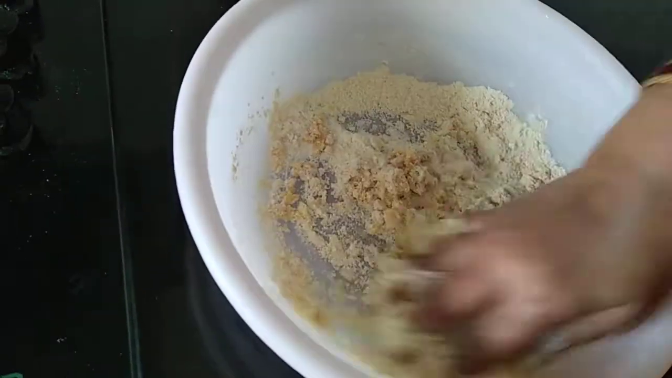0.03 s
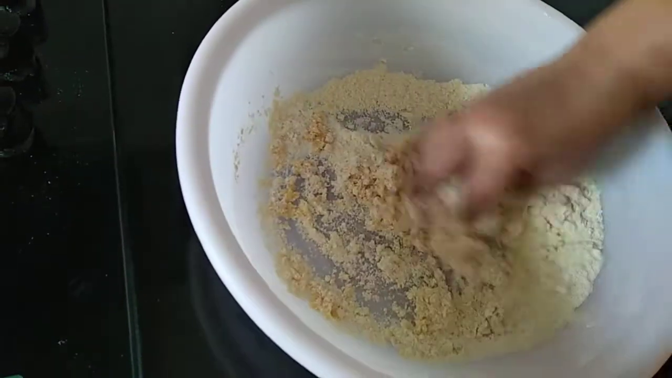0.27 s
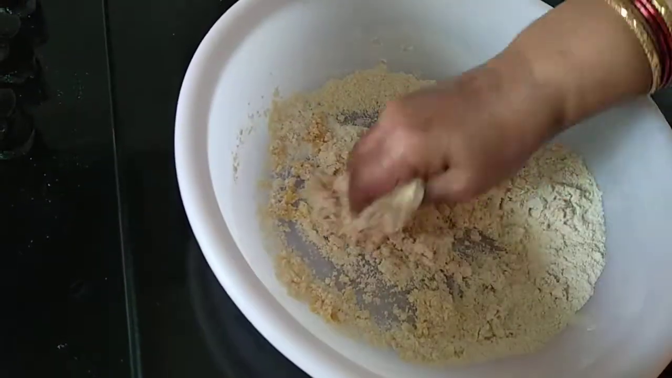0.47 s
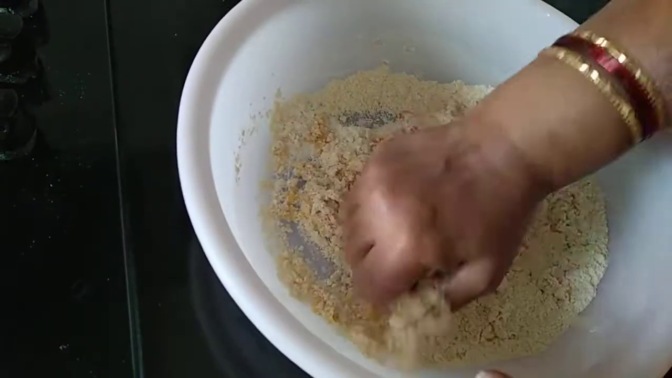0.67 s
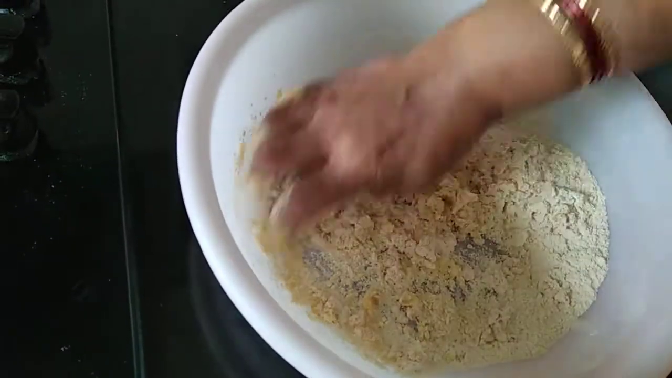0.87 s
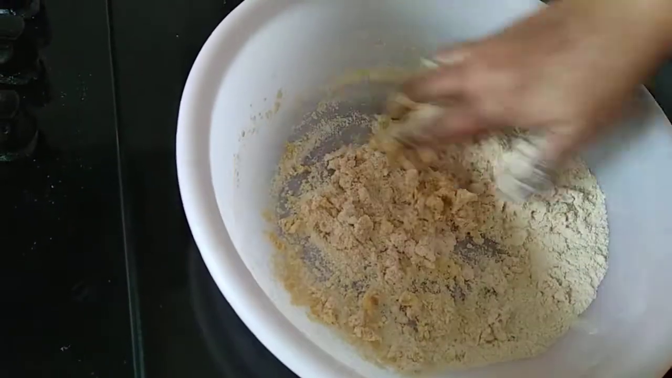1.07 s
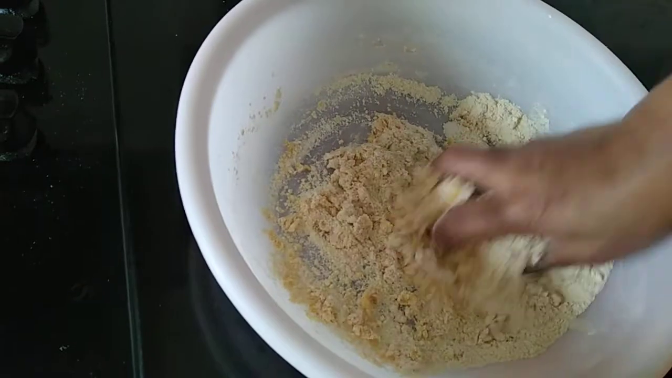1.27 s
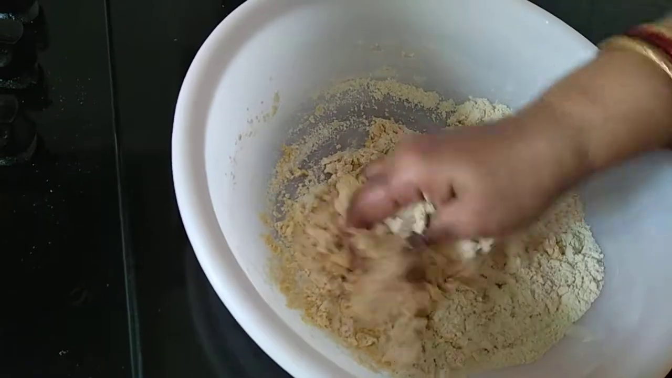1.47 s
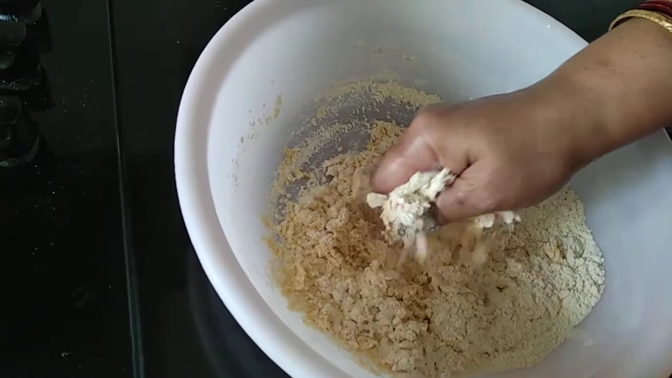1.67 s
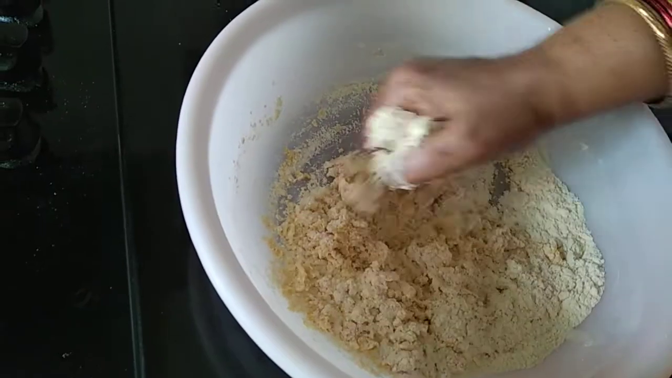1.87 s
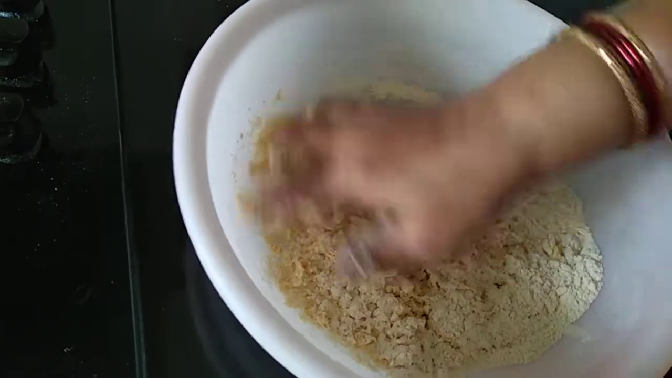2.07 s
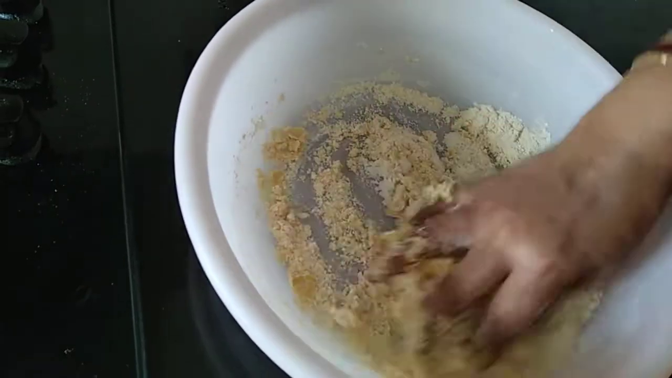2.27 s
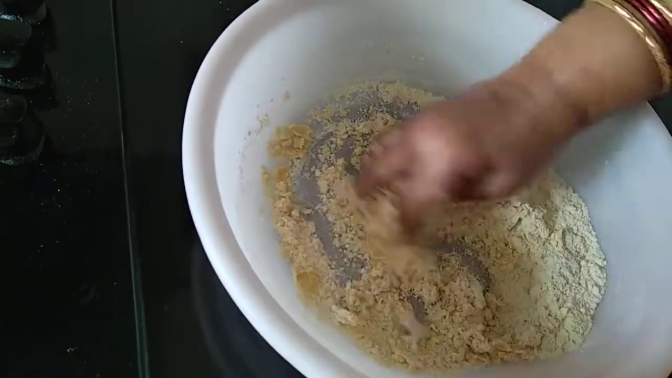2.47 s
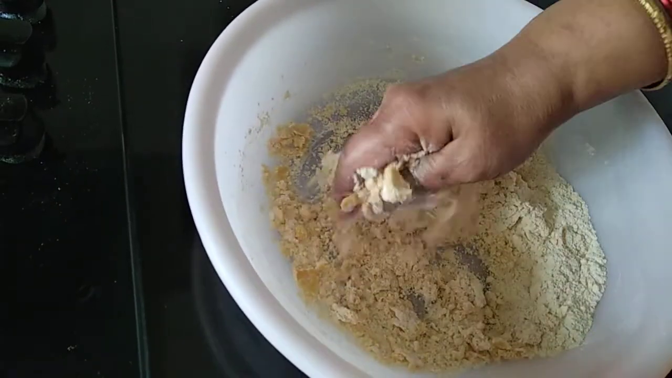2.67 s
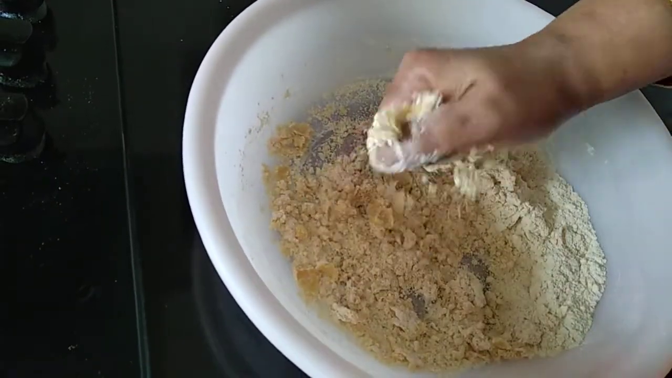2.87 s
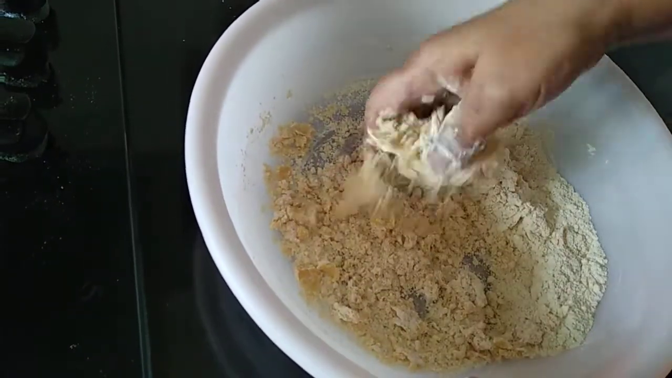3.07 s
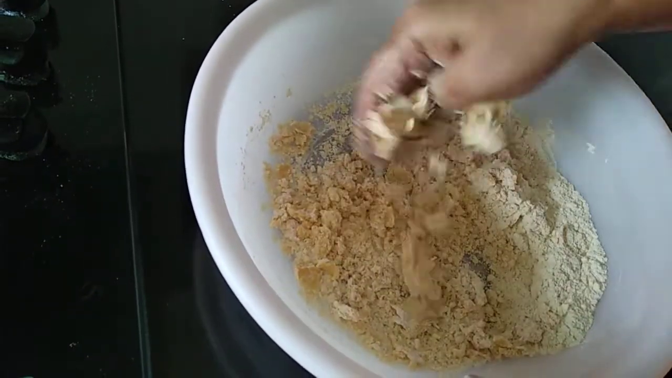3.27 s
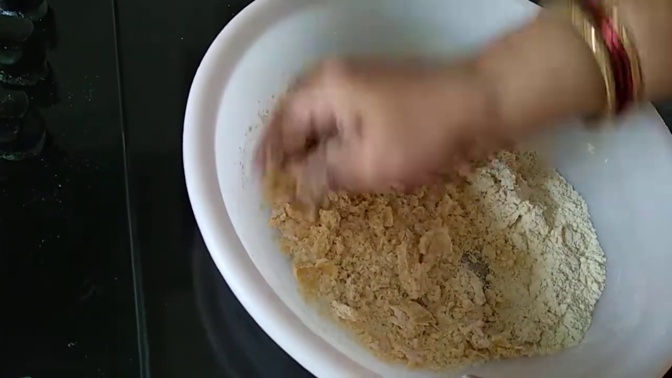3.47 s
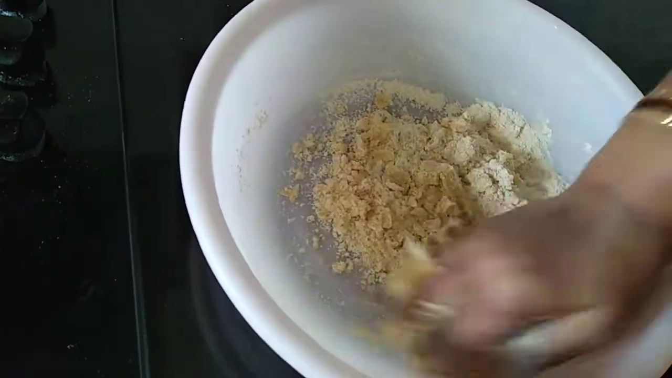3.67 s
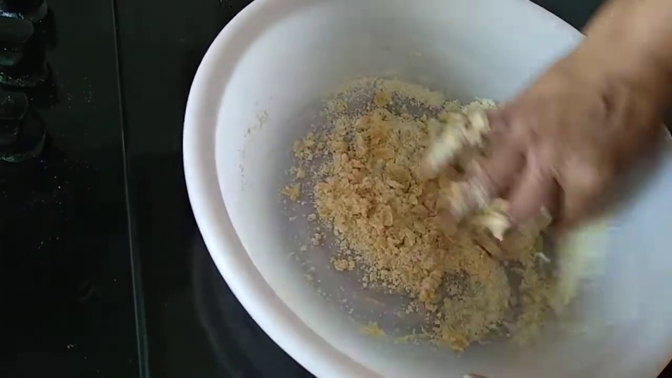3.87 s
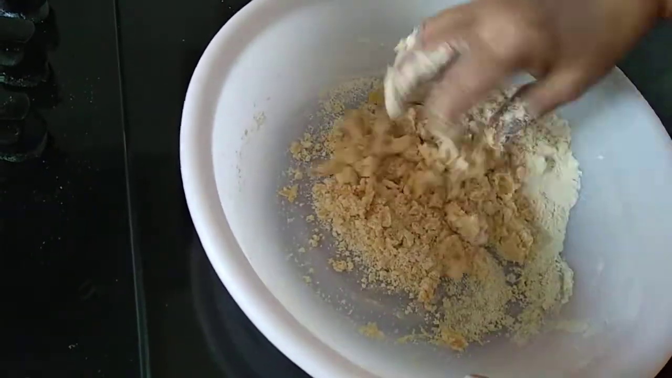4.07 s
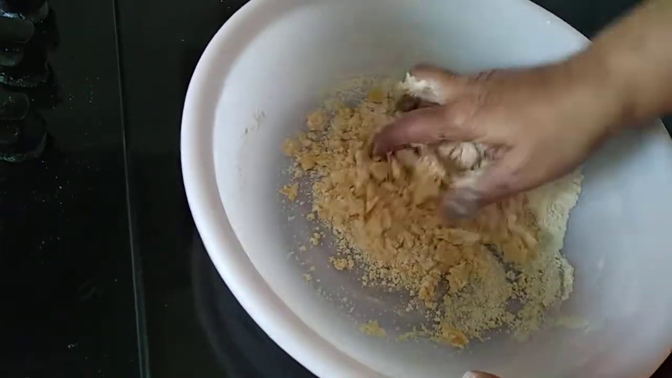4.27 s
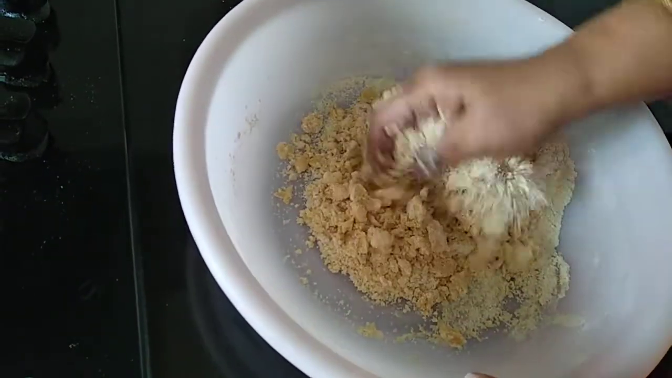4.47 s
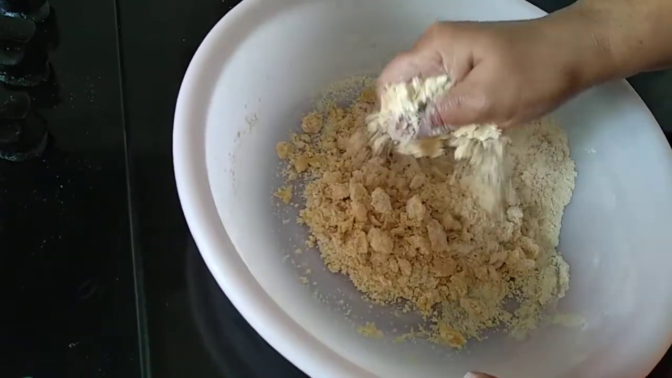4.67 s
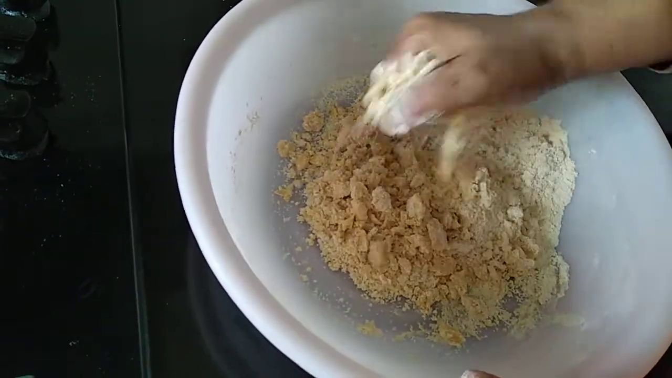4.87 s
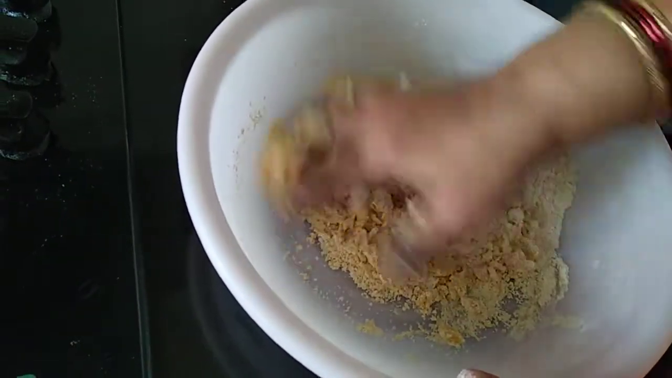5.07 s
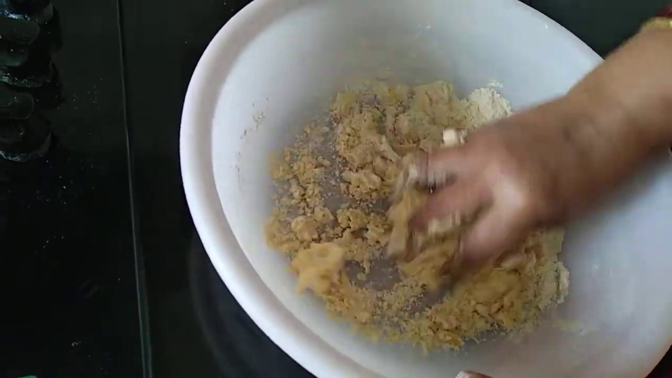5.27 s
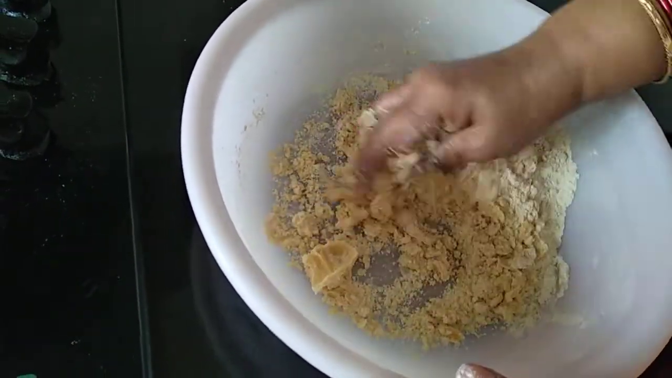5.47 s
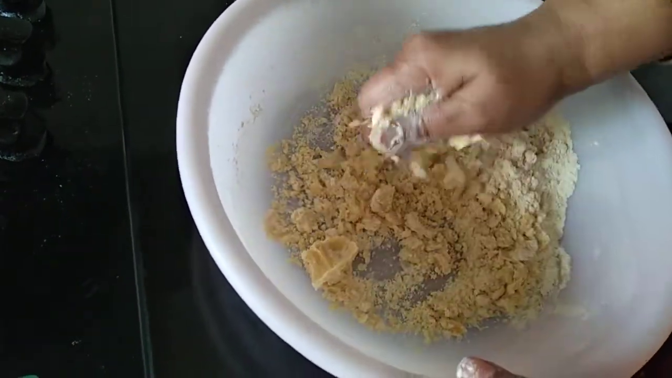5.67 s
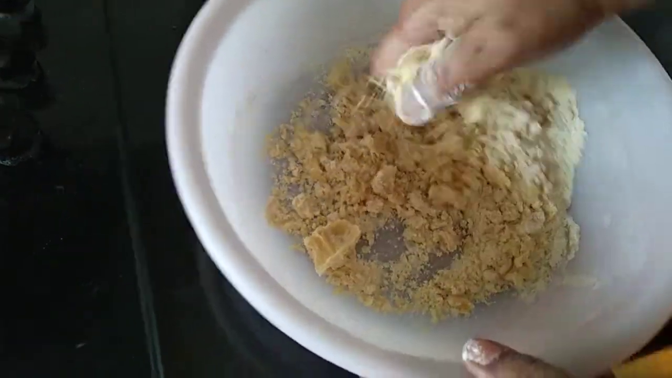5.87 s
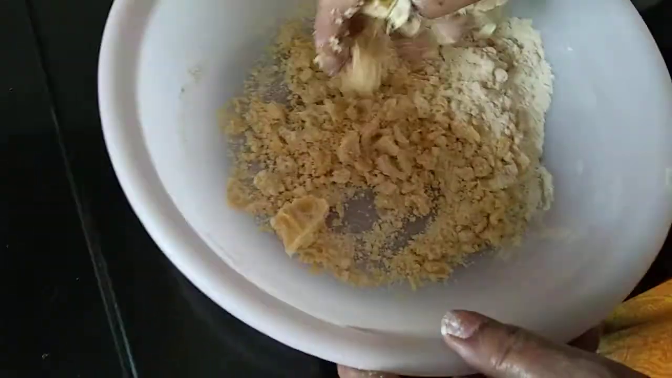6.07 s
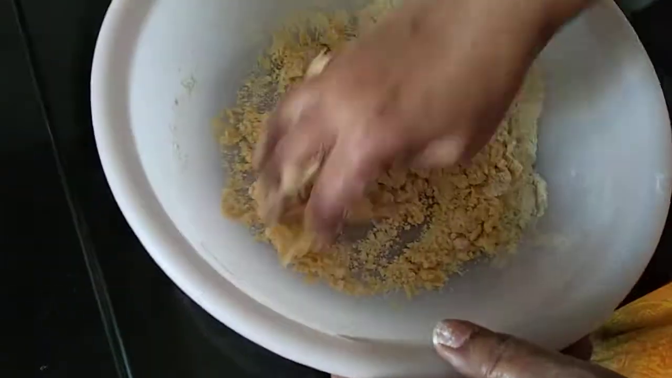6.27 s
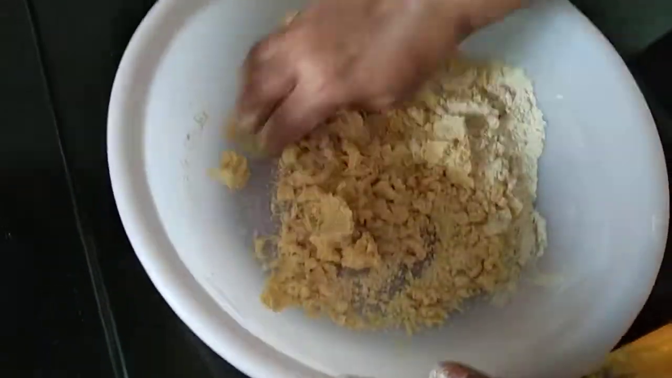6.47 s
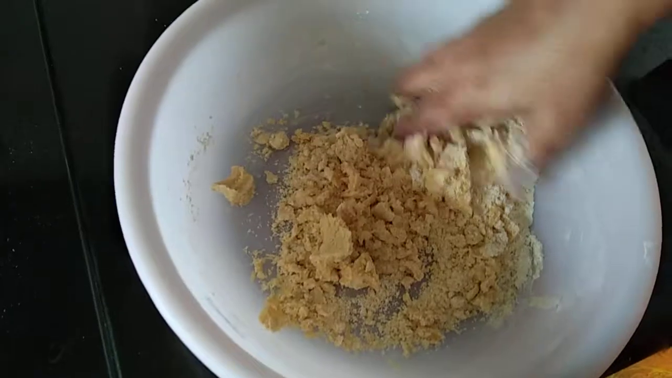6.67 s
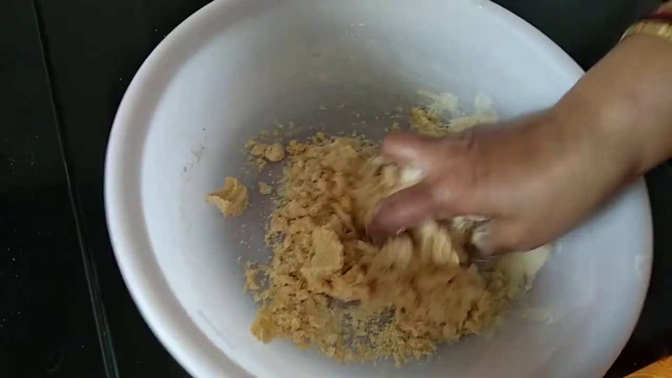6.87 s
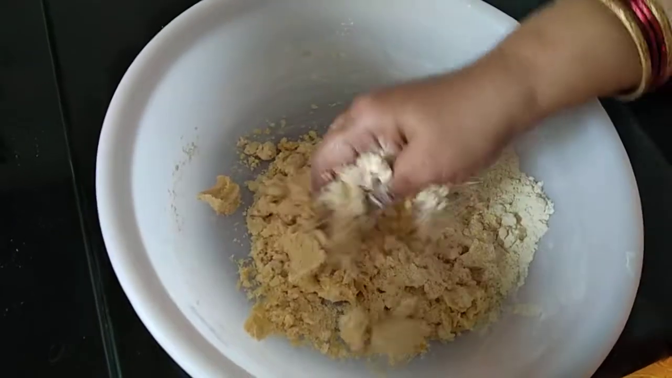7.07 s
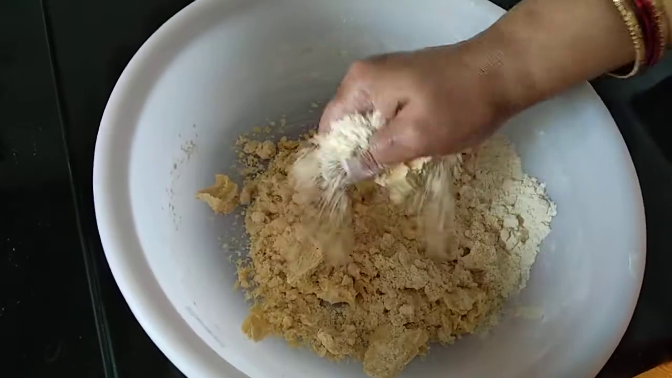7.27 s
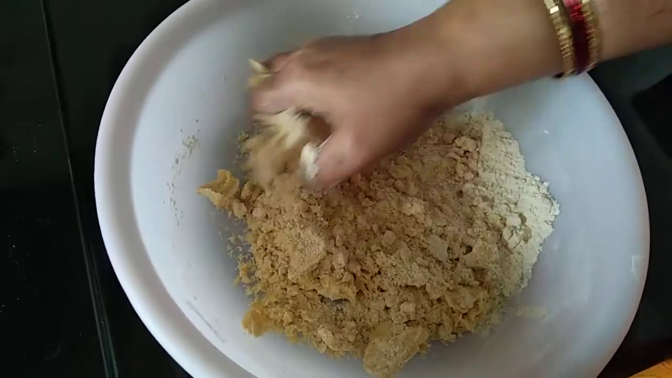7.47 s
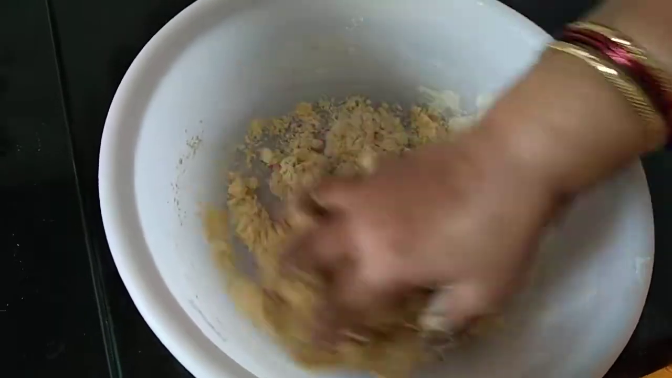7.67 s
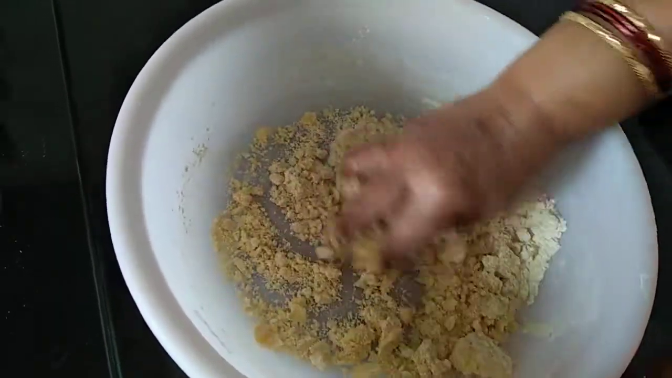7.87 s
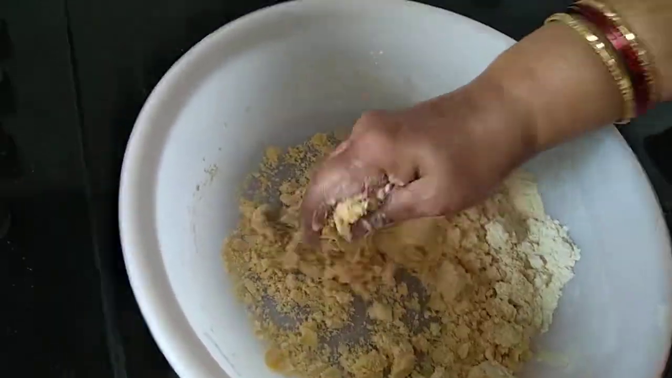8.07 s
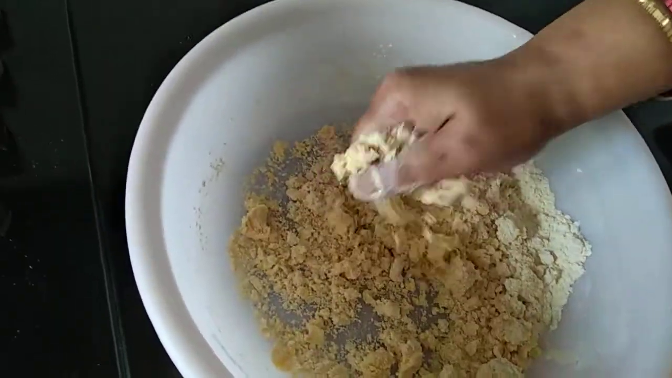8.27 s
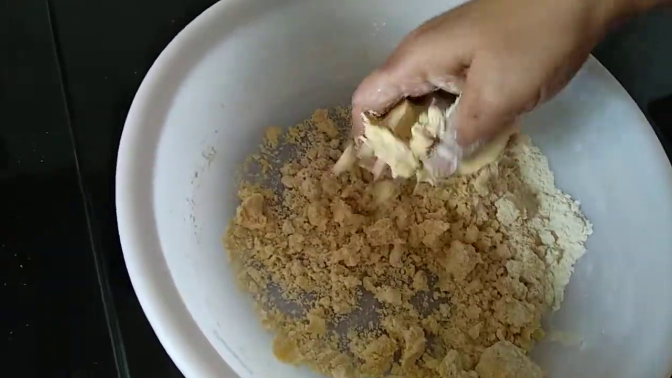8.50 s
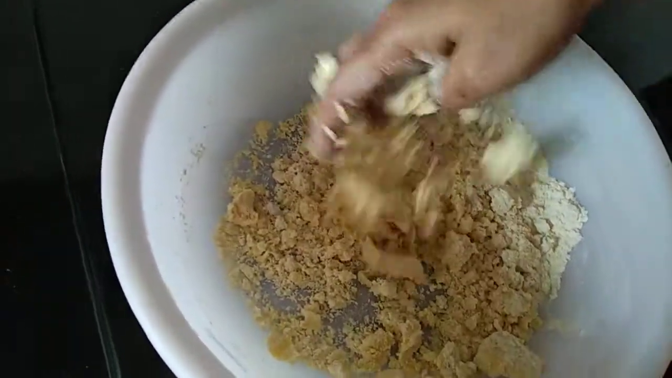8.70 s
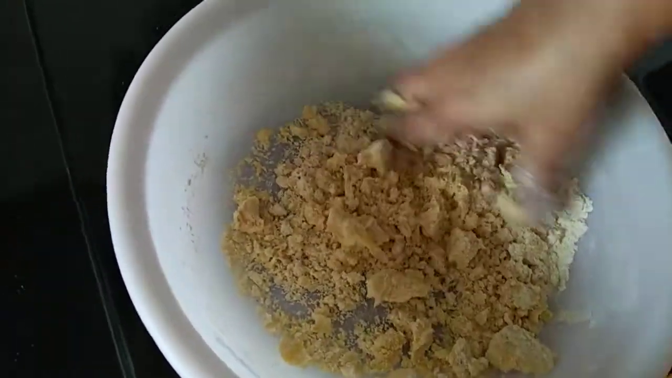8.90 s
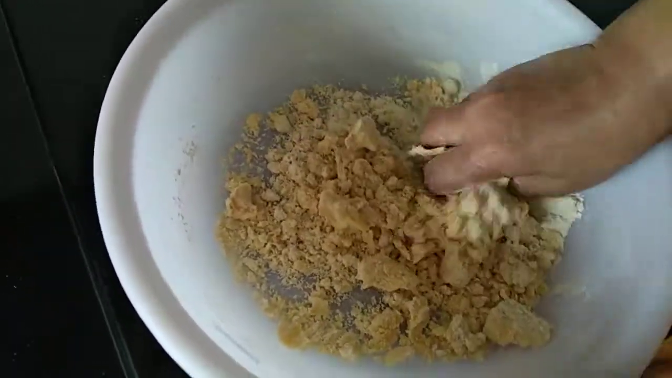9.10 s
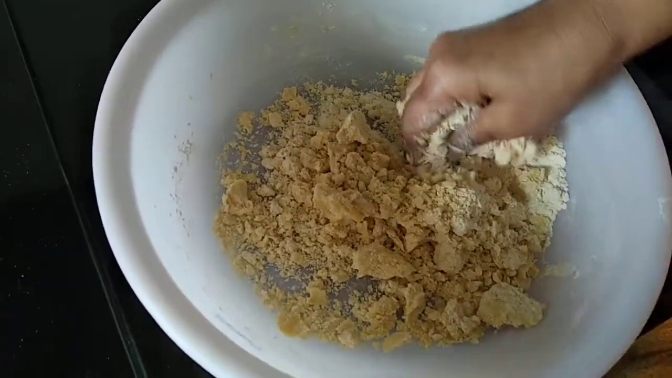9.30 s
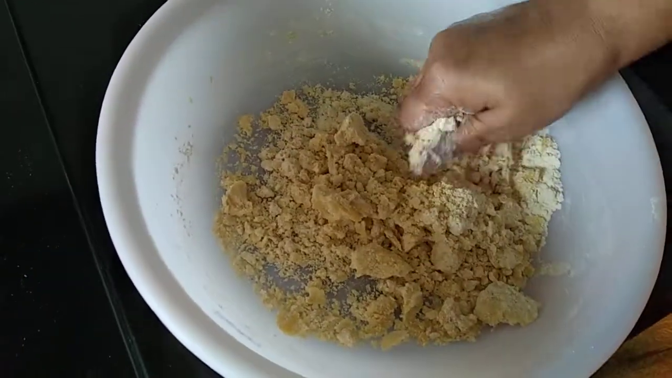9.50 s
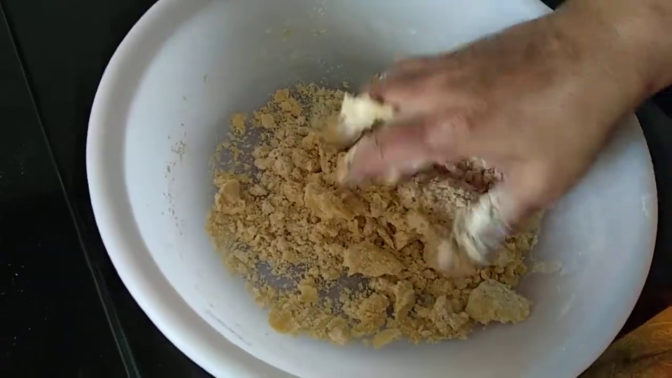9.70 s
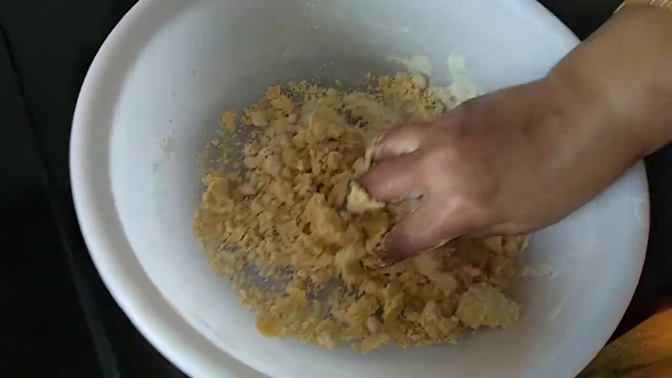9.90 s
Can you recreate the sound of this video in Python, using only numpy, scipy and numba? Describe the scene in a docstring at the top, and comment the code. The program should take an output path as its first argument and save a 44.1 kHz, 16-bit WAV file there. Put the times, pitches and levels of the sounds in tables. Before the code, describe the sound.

A hand rubs flour around a plastic bowl in uneven scratchy sweeps, with nail ticks and dull bumps over a low fan hum.

```python
"""A small kitchen: a hand rubs oil into flour in a plastic bowl on a stone counter, heard close up.
Each sweep drags countless crumbs over the bowl wall; their tiny slips rustle and make the wall ring.
Between sweeps the fingers squeeze and crumble almost silently. Fingertips knock the wall,
the bowl bumps and skids on the counter, bangles clink and a fan hums behind it all."""
import sys
import numpy as np
from scipy import signal
from scipy.fft import rfft, irfft
from scipy.io import wavfile
from scipy.ndimage import uniform_filter1d
from numba import njit

SR = 44100
rng = np.random.default_rng(int(sys.argv[2]) if len(sys.argv) > 2 else 0)


def dump_mix(stems):
    """Bounce the given channels to the path in sys.argv[1] as a 16-bit WAV at rate SR."""
    frames = np.atleast_2d(stems).T  # one column per channel
    limited = np.clip(frames, -1, 1)  # hard clip at full scale
    pcm = np.round(limited * 32767).astype(np.int16)
    wavfile.write(sys.argv[1], SR, pcm)


N = 438354
TIME_S = np.arange(N) / SR
FREQS_HZ = np.fft.rfftfreq(N, 1 / SR)
LEFT_LAG_SAMPLES = 7

# fan rumble and hiss: freq_hz, density_db
FAN_SPECTRUM = [(20, -41), (32, -15), (48, 1), (85, -6.5), (125, -7.5), (220, -12.5), (320, -15.5),
                (520, -21), (1000, -23.5), (2000, -31), (4500, -36.5), (10000, -35), (15800, -40.5)]
# fan hum peaks: centre_hz, width_hz, boost_db
FAN_HUM = [(79.6, 15.6, 8), (315.9, 8.6, 10), (465, 12, 3), (589.7, 6.9, 16.5), (705, 12, 2),
           (1038.4, 27, 6)]
# bangle modes: pitch_ratio, level_db, t60_s
BANGLE_MODES = [(1, 4, .3), (1.47, -9.5, .2), (1.84, -13.5, 0.17), (2.33, -11, .12)]
# bangles touching: start_s, level_db, pitch_hz
BANGLE_CLINKS = [(0.665, -56, 4000), (0.725, -53, 4100), (0.79, -60, 4045), (7.29, -63, 3800),
                 (7.335, -69, 3050), (7.385, -73, 3400)]
# bowl skidding on the counter: start_s, length_s, level_db, pitch_hz
BOWL_SKIDS = [(2.755, 0.288, -70, 276), (3.439, 0.156, -62.5, 246), (3.927, 0.2, -50.5, 324.6),
              (4.139, 0.21, -55, 265.7), (4.37, 0.0793, -54, 191), (4.882, 0.194, -63, 349),
              (5.574, 0.222, -63.5, 250), (6.909, 0.19, -53, 139)]
# rocking modes of the loaded bowl: freq_hz, level_db, t60_s
BASE_MODES = [(60.8, -8, 0.28), (93.3, 3, 0.16), (176.5, -6, 0.15), (296.7, -5.5, 0.075),
              (451.4, -22, 0.011)]
# bowl bumping the counter: start_s, level_db, hardness_db_per_octave
BOWL_BUMPS = [(0.392, -47.5, -35), (0.876, -40, -43), (2.063, -32.5, 1.5), (2.067, -43.5, 9),
              (2.132, -58.5, 10.5), (2.645, -48, -35), (3.934, -36.5, 26.5), (3.954, -34.5, 25.5),
              (4.013, -35, 35.5), (4.057, -39, 26.5), (4.092, -48.5, 19), (4.159, -39.5, 23.5),
              (5.043, -46.5, 14), (5.86, -54, -26.5), (6.241, -53.5, -23), (6.719, -45.5, -18.5),
              (7.567, -35, 2.5), (7.592, -38.5, 2), (7.654, -41, 18), (7.721, -50, -3), (8.851, -45.5, -15),
              (8.971, -47, -8), (9.228, -45.5, 23.5)]
# nails and hard crumbs on plastic: start_s, peak_db
NAIL_TICKS = [(0.879, -11), (0.984, -12.5), (1.423, -26.5), (3.225, -56), (3.235, -48.5), (4.522, -47.5),
              (4.835, -53.5), (4.977, -43), (5.045, -32.5), (6.453, -20.5), (6.517, -16), (7.574, -24),
              (7.735, -10.5), (8.945, -20), (9.229, -22.5)]
# bowl wall resonances: freq_hz, width_hz, gain_db
WALL_MODES = [(794, 71, 4.5), (1013, 310, 0), (1570.5, 133, 11), (1780, 500, 0), (2380, 400, -5)]
# fingertips and lumps hitting the wall: start_s, level_db, low_mode_gain_db, spot_hz
WALL_KNOCKS = [(0.055, -55, 14.5, 800), (0.291, -51.5, 16, 1030), (0.663, -61, 8.5, 1570),
               (1.185, -39, 2, 1570), (1.422, -40, 9, 1020), (2.061, -36, -13.5, 1850),
               (4.247, -36.5, -11, 1030), (5.044, -42.5, -7.5, 1570), (6.326, -54, 12.5, 1030),
               (7.51, -55.5, 14.5, 800), (7.572, -39, 13, 1030), (8.023, -58, 0, 800),
               (9.012, -42, -1.5, 1570), (9.044, -45, 6, 800), (9.228, -39, 2, 847)]
# fingertips rubbing flour above the bowl: start_s, length_s, level_db
FINGER_RUBS = [(1.86, 0.41, -71), (2.764, 0.144, -69), (2.972, 0.055, -69.5), (3.056, 0.055, -73.5),
               (3.201, 0.149, -69.5), (4.553, 0.163, -75), (4.71, 0.135, -70.5), (5.528, 0.11, -80),
               (5.694, 0.12, -74), (5.84, 0.089, -73), (7.137, 0.077, -72), (8.418, 0.56, -68.5),
               (9.33, 0.275, -77.5)]
# lumps giving way: start_s, level_db, centre_hz, t60_s
LUMP_SQUEEZES = [(0.81, -60.5, 1930, 0.22), (1.419, -41, 2600, 0.083), (3.116, -60.5, 6500, 0.074),
                 (3.219, -73, 3260, 0.62), (3.295, -61, 8800, 0.13), (4.90, -64, 8620, 0.32),
                 (4.943, -56, 1790, 0.099), (7.475, -62.5, 1880, 0.47), (7.506, -52.5, 9400, 0.082),
                 (8.02, -38.5, 3350, 0.04), (8.293, -58, 2525, 0.316), (8.334, -62, 2410, 0.133),
                 (8.369, -60.5, 2540, 0.285), (8.731, -61, 2720, 0.39)]
# slipping crumbs: freq_hz, density_db
CRUMB_SPECTRUM = [(1400, -7.5), (2000, -4), (2450, -1), (3100, -1.5), (4100, -8), (5500, -9.5), (7500, -6),
                  (9300, -2), (11000, -3.5), (13000, -7.5), (15800, -12.5)]
# strokes through the flour: start_s, attack_s, length_s, level_db, swell_db, pressure_db, powder_db
HAND_STROKES = [(0.0, 0.00069, 0.268, -41, -10, -21, 4), (0.2, 0.03, 0.111, -41, 2, -14.5, 3.5),
                (0.387, 0.026, 0.0683, -53, -1.5, -20, 0), (0.606, 0.019, 0.1463, -55.5, 2.5, -30, 12.5),
                (0.862, 0.019, 0.1264, -31.5, -1.5, -16, -0.5), (0.961, .04, 0.2212, -32.5, -10.5, -6, 2),
                (1.163, 0.0071, 0.2385, -47.5, 13, -12.5, 2), (1.787, 0.013, 0.193, -69.5, -11.5, -36.5, 4),
                (2.029, 0.022, 0.1777, -34.5, 5, -16, 0.5), (2.214, 0.029, 0.1593, -39.5, -1, -17, 4),
                (2.382, 0.034, 0.1172, -43.5, 0.5, -8, 4), (3.398, 0.0422, 0.0646, -46, 8.5, -21, -2.5),
                (3.438, 0.055, 0.1734, -31.5, 5, -11, 1.5), (3.64, 0.017, 0.2624, -37.5, 0, -9, 6),
                (3.968, 0.016, 0.053, -57, 1, 7, 1), (4.078, 0.013, 0.19, -74, 1, 15, -25),
                (4.182, 0.012, 0.1148, -40.5, 1.5, -6, 4.5), (4.31, 0.045, 0.1047, -44, -3.5, -4.5, 4),
                (4.971, .002, 0.023, -59, 0, 0.5, -20.5), (5.036, 0.006, 0.1114, -35.5, 3.5, -13, 1.5),
                (5.163, 0.027, 0.0752, -41.5, -2, -14.5, 9), (5.245, .04, 0.1626, -43.5, -3, -12.5, 5),
                (6.189, 0.014, 0.183, -50.5, -9, -10.5, 5), (6.374, 0.035, 0.1405, -32.5, 7.5, -16.5, 2.5),
                (6.523, 0.015, 0.2004, -34.5, -2, -7.5, 4), (6.761, 0.006, 0.2055, -43.5, 7, -5.5, 3),
                (7.023, 0.018, 0.1057, -61.5, -11.5, -26.5, 5),
                (7.533, 0.0963, 0.2807, -35.5, -4, -12.5, 2.5), (7.818, 0.063, 0.132, -37, -7.5, -7, 2.5),
                (7.987, .01, 0.0565, -55, 1, -26.5, 4), (8.278, 0.014, 0.0608, -59.5, 7.5, -36.5, 9),
                (8.66, 0.022, 0.106, -65, -4.5, -8, 8.5), (8.833, 0.025, 0.1171, -34, 3, -8, 0.5),
                (9.006, 0.0099, 0.0804, -41, -4.5, -9.5, 2), (9.153, 0.044, 0.0533, -44, -3, -16.5, -5),
                (9.842, 0.12, 0.255, -52, 2.5, -24.5, -9.5)]
# colour of the two microphone ports: freq_hz, left_minus_right_db
PORT_BALANCE = [(100, 1.5), (400, 2), (1100, -.3), (3000, 0), (5000, -1.7), (6500, -1.5), (9200, -5),
                (10800, 0), (12500, 3.7), (15500, 3)]


def undb(db):
    """Decibels to gain."""
    return 10 ** (np.asarray(db) / 20)


def unit(x):
    """Scale to rms 1."""
    return x / np.sqrt(np.mean(x ** 2))


def spectrum_db(points):
    """Interpolate a spectrum onto FREQS_HZ, in log frequency."""
    hz, db = np.transpose(points)
    return np.interp(np.log(FREQS_HZ + 1e-9), np.log(hz), db)


def band(x, lo_hz, hi_hz, order=2):
    """Butterworth band-pass."""
    sos = signal.butter(order, [lo_hz, min(hi_hz, SR / 2 - 1)], "band", fs=SR, output="sos")
    return signal.sosfilt(sos, x)


@njit
def moving_band(x, centre_hz, width_hz):
    """State-variable band-pass; gain 1 at its moving centre."""
    y, band_state, low_state = np.empty(len(x)), 0., 0.
    for i in range(len(x)):
        g, damping = np.tan(np.pi * centre_hz[i] / SR), width_hz / centre_hz[i]
        v = (band_state + g * (x[i] - low_state)) / (1 + g * (g + damping))
        band_state, low_state = 2 * v - band_state, low_state + 2 * g * v
        y[i] = damping * v
    return y


def walk(rate_hz):
    """Smooth random drift within +-2."""
    hold = int(SR / rate_hz)
    steps = np.repeat(rng.standard_normal(N // hold + 3), hold)
    smooth = uniform_filter1d(uniform_filter1d(steps, hold), hold)
    return 2 * np.tanh(unit(smooth[hold:hold + N]) / 2)


def add(track, start_s, sound):
    """Mix a sound into a stereo track."""
    i = round(start_s * SR)
    track[:, i:i + sound.shape[-1]] += sound[..., :track.shape[1] - i]


def grains(per_s, spread_db):
    """Random tiny slips: most weak, a few strong."""
    happens = rng.random(N) < per_s / SR
    size = undb(spread_db * np.minimum(rng.exponential(size=N), 6))
    return unit(happens * size * rng.choice([-1, 1], N) / np.sqrt(np.minimum(per_s, SR)))


def stereo_grains(per_s, spread_db, wet_db):
    """Direct slips reach the right port first; bowl and room scatter differs per port."""
    direct = grains(per_s, spread_db)
    scatter = np.array([grains(per_s, spread_db) for port in range(2)])
    return unit(np.array([np.roll(direct, LEFT_LAG_SAMPLES), direct]) + undb(wet_db) * scatter)


def fan(level_db=-60, wide_above_hz=650, swell_db=3.5):
    """Uneven rumble and blurred hum over faint hiss; the bass is alike at both ports."""
    hum_db = sum(db / (1 + (2 * (FREQS_HZ - hz) / width_hz) ** 2) for hz, width_hz, db in FAN_HUM)
    mid, side = rfft(rng.standard_normal((2, N))) * undb(spectrum_db(FAN_SPECTRUM) + hum_db)
    side = side * np.clip(FREQS_HZ / wide_above_hz, .18, 1)
    air = unit(irfft(np.array([mid + side, mid - side]), N))
    rumble = irfft(rfft(air) / (1 + (FREQS_HZ / 85) ** 4), N)
    air = air + rumble * (undb(swell_db * walk(9.7)) - 1)
    return air * undb(level_db + 1.8 * walk(3.9))


def bangles(rise_s=0.0043, touches=3, bounce_s=.024, bounce_db=-2.5):
    """Loose metal bangles bounce on each other; each touch rings a little differently."""
    out, t = np.zeros((2, N)), TIME_S[:SR // 4]
    onset = 1 - np.exp(-t / rise_s)
    for start_s, db, hz in BANGLE_CLINKS:
        for bounce in range(touches):
            late_s = bounce_s * bounce * rng.uniform(.7, 1.3)
            for ratio, mode_db, t60_s in BANGLE_MODES:
                detune, touch_db = rng.normal([1, 0], [.012, 3])
                ring = np.sin(2 * np.pi * (hz * ratio * detune * t + rng.random((2, 1))))
                fade_db = db + mode_db + touch_db + bounce_db * bounce - 60 * t / t60_s
                add(out, start_s + late_s, ring * onset * undb(fade_db) / np.sqrt(touches))
    return out


def skids(edge_s=0.0088, catch_db=3.0, fade_db=1, trim_db=-2):
    """The base drags over stone: a low, grainy, uneven rub."""
    out = np.zeros((2, N))
    for start_s, length_s, db, hz in BOWL_SKIDS:
        t = TIME_S[:int(length_s * SR)]
        slips = stereo_grains(900, spread_db=0, wet_db=-5.5)[:, :len(t)]
        drag = unit(band(slips, hz / 1.106, hz * 1.686, order=3))
        shape_db = db + catch_db * walk(40.84)[:len(t)] - fade_db * (t / length_s - .5)
        edges = np.minimum(np.minimum(t, length_s - t) / edge_s, 1)
        add(out, start_s, drag * edges * undb(shape_db + trim_db))
    return out


def bumps(rise_s=0.0041, rattle=0.3, room_db=-20, room_t60_s=0.72, trim_db=4):
    """The loaded bowl rocks on its base: a few dull cycles, higher after a harder blow."""
    out, t = np.zeros((2, N)), TIME_S[:SR // 3]
    onset = 1 - np.exp(-t / rise_s)
    mode_hz, mode_db, mode_t60_s = np.transpose(BASE_MODES)
    for start_s, db, hardness_db_per_octave in BOWL_BUMPS:
        shares = undb(mode_db + hardness_db_per_octave * np.log2(mode_hz / mode_hz[0]))
        for hz, share, t60_s in zip(mode_hz, shares / np.linalg.norm(shares), mode_t60_s):
            noise = unit(band(rng.standard_normal((2, len(t))), hz / 1.6, hz * 1.75, order=3))
            swing = (np.sin(2 * np.pi * hz * t) + rattle * noise[0]) * undb(-60 * t / t60_s)
            echo = noise * undb(room_db - 60 * t / room_t60_s)
            add(out, start_s, share * (swing + echo) * onset * undb(db + trim_db))
    return band(out, 23, 620, order=3)


def nails(t60_s=0.0049):
    """Nails and hard crumbs tick on the plastic."""
    out, t = np.zeros((2, N)), TIME_S[:SR // 20]
    for start_s, peak_db in NAIL_TICKS:
        tick = band(rng.standard_normal((2, len(t))) * undb(-60 * t / t60_s), 2000, 12000)
        add(out, start_s, tick / abs(tick).max() * undb(peak_db))
    return out


def wall(push, low_db=0, spot_hz=None, spot_db=9.5, spot_octaves=0.12):
    """The plastic rings briefly; each knock sets its own weight of the low modes and favours those of the spot
    struck."""
    out = 0
    for hz, width_hz, db in WALL_MODES:
        ring = signal.lfilter(*signal.iirpeak(hz, hz / width_hz, fs=SR), push)
        nearness = np.exp(-(np.log2(hz / spot_hz) / spot_octaves) ** 2) if spot_hz else 0
        out = out + undb(db + spot_db * nearness + low_db * (hz < 1300)) * ring
    return band(out, 740, 2900, order=3)


def knocks(crush_db=-20, crush_t60_s=0.0693, soft_hz=1700, room_db=-33, room_t60_s=0.213):
    """A soft fingertip hits the wall and crushes crumbs; the kitchen answers faintly."""
    out, t = np.zeros((2, N)), TIME_S[:SR // 4]
    fade = undb(crush_db - 60 * t / crush_t60_s) + undb(room_db - 60 * t / room_t60_s)
    for start_s, db, low_db, spot_hz in WALL_KNOCKS:
        push = fade * rng.standard_normal((2, len(t)))
        push[[0, 1], [LEFT_LAG_SAMPLES, 0]] += 1  # impact
        ring = wall(band(push, 100, soft_hz), low_db, spot_hz)
        onset_rms = ring[:, :SR // 50].std()
        add(out, start_s, ring / onset_rms * undb(db))
    return out


def scrape(level_db, pressure_db, catch_db=5.0, trim_db=-1):
    """Crumbs trapped under the fingers stick and slip, ringing the wall."""
    slips = stereo_grains(5000, spread_db=3.0, wet_db=-8) * undb(catch_db * walk(45))
    return unit(wall(slips)) * undb(level_db + pressure_db + trim_db)


def crumble(drops_db=-4):
    """Fingers rub flour together: a soft swell of dust, tiny crumbs ticking down."""
    effort = sum(undb(db) * np.sin(np.pi * np.clip((TIME_S - start_s) / length_s, 0, 1))
                 for start_s, length_s, db in FINGER_RUBS)
    dust = unit(band(rng.standard_normal((2, N)), 8700, 13500, order=3))
    drops = unit(band(stereo_grains(200, spread_db=2.2, wet_db=0), 4500, 13000, order=3))
    return effort * (dust + drops * undb(drops_db))


def squeezes(rise_s=0.00245, edge_ratio=1.259, trim_db=4):
    """A lump cracks and crumbles in a short, fading crunch."""
    out, t = np.zeros((2, N)), TIME_S[:SR // 2]
    onset = 1 - np.exp(-t / rise_s)
    for start_s, db, hz, t60_s in LUMP_SQUEEZES:
        cracks = rng.standard_normal((2, len(t))) * (rng.random(len(t)) < .06)
        crunch = unit(band(cracks, hz / edge_ratio, hz * edge_ratio))
        add(out, start_s, crunch * onset * undb(db + trim_db - 60 * t / t60_s))
    return out


def grit(level_db, trim_db=-6):
    """Hard crumbs snap against the plastic and stick out of the rustle."""
    snaps = band(stereo_grains(320, spread_db=2.4, wet_db=-3), 3500, 13000, order=1)
    return unit(snaps) * undb(level_db + trim_db)


def hand(arch_db=1.5, release_db_per_s=172, settle_s=0.41, lift_db_per_s=53, linger_db_per_s=26.5):
    """Strokes set in, arch and settle; powder trickles on as the hand lifts. The strongest leads."""
    power, pressure_sum, powder_sum = np.full(N, 1e-12), np.zeros(N), np.zeros(N)
    for start_s, attack_s, length_s, level_db, swell_db, pressure_db, powder_db in HAND_STROKES:
        span = (TIME_S >= start_s) & (TIME_S < start_s + length_s + .5)
        t = TIME_S[span] - start_s
        along = np.minimum(t / length_s, 1) - .5
        after_s = np.maximum(t - length_s, 0)
        release_db = release_db_per_s * after_s * (1 + after_s / settle_s)
        shape_db = swell_db * along - arch_db * (2 * along) ** 2 - release_db
        stroke = (np.minimum(t / attack_s, 1) * undb(level_db + shape_db)) ** 2
        power[span] += stroke
        # along a stroke the hand leans harder and the powder share dips
        pressure_sum[span] += stroke * (pressure_db + 3 * along - lift_db_per_s * after_s)
        powder_sum[span] += stroke * (powder_db - 0.5 * along + linger_db_per_s * after_s)
    return 10 * np.log10(power), pressure_sum / power - 1, powder_sum / power


def reflect(x, wet_db, bowl_t60_s=0.04, room_db=-6, room_t60_s=0.11):
    """Echoes off bowl, hand and kitchen; the moving hand changes their pattern ten times a second."""
    hop = SR // 10
    out, t = np.zeros((2, N + hop)), TIME_S[:SR // 6]
    padded = np.pad(x, (hop, 2 * hop))
    for i in range(0, N + hop, hop):
        near = unit(rng.standard_normal((2, len(t))) * undb(-60 * t / bowl_t60_s))
        far = unit(rng.standard_normal((2, len(t))) * undb(-60 * t / room_t60_s))
        response = undb(wet_db) * (near + undb(room_db) * far) / np.sqrt(len(t))
        response[[0, 1], [LEFT_LAG_SAMPLES, 0]] += 1  # direct path
        response /= np.sqrt(np.sum(response ** 2) / 2)
        piece = padded[i:i + 2 * hop] * np.sqrt(np.hanning(2 * hop))
        add(out, i / SR, signal.fftconvolve(piece[None], response, axes=1))
    return out[:, hop:]


def hollow(x, level_db, centre_hz=5000, width_hz=1500.0, drift_octaves=.2):
    """The hollow under the hand rings broadly; its pitch shifts as the fingers open and close."""
    hz = centre_hz * 2 ** (drift_octaves * walk(9))
    ring = np.array([moving_band(channel, hz, width_hz) for channel in x])
    ring_db = -7 + np.minimum(level_db + 25, 0) / 2
    return x + ring * undb(ring_db)


def band_flicker(x, flicker_db=1.3):
    """Each frequency band of the rustle flickers slightly at random, giving a patchy texture."""
    spectra = signal.stft(x, nperseg=256)[2]
    flicker = rng.standard_normal(spectra.shape[1:])
    flicker = uniform_filter1d(uniform_filter1d(flicker, size=5, axis=0), size=11, axis=1)
    gain = unit(undb(flicker_db * unit(flicker)))
    return signal.istft(spectra * gain)[1][:, :N]


def rustle(level_db, pressure_db, powder_db, lump_hz=3650, powder_hz=7500, catch_db=0.6835):
    """Crumbs slip more densely in a fast sweep; oily lumps rasp low, dry powder hisses high."""
    per_s = 5000 + 22000 * undb((level_db + 33.5) / 2)
    low_cut = 1 / (1 + (1350 / (FREQS_HZ + 1)) ** 6)
    slips = rfft(grains(per_s, spread_db=2.5)) * undb(spectrum_db(CRUMB_SPECTRUM)) * low_cut
    coarse = 1 / (1 + (FREQS_HZ / lump_hz) ** 20)
    fine = 1 - 1 / (1 + (FREQS_HZ / powder_hz) ** 10)
    # lumps rasp when pressed; a fast sweep throws them aside
    rasp_db = -4 + 0.33 * (pressure_db + 18.5) - np.maximum(level_db + 38, 0)
    lumps = unit(irfft(slips * coarse, N)) * undb(rasp_db)
    crumbs = unit(irfft(slips * (1 - coarse - fine), N))
    powder = unit(irfft(slips * fine, N)) * undb(powder_db)
    return (lumps + crumbs + powder) * undb(level_db + catch_db * walk(55))


def sweep(level_db, pressure_db, powder_db, trim_db=0.3064):
    """A slow rub echoes from under the fingertips; a fast sweep scatters crumbs all over the bowl."""
    fingers = reflect(rustle(level_db, pressure_db, powder_db), wet_db=13)
    spray = np.array([rustle(level_db, pressure_db, powder_db) for port in range(2)])
    spray_share = np.interp(level_db, [-46, -33], [.12, .32])
    flour = fingers * np.sqrt(1 - spray_share) + spray * np.sqrt(spray_share)
    return hollow(flour, level_db) * undb(trim_db)


def scene():
    """The hand's strokes drive crumbs and bowl wall together."""
    level_db, pressure_db, powder_db = hand()
    sweeps = band_flicker(sweep(level_db, pressure_db, powder_db))
    flour = sweeps + grit(level_db) + squeezes() + crumble()
    bowl = scrape(level_db, pressure_db) + knocks() + nails() + bumps() + skids()
    return flour + bowl + bangles() + fan()


def record(dry):
    """Each microphone port colours the sound; steep cut above 15.8 kHz."""
    port_gain = undb(np.array([[1], [-1]]) * spectrum_db(PORT_BALANCE) / 2)
    low_pass = signal.ellip(10, .2, 80, 15800, fs=SR, output="sos")
    return signal.sosfilt(low_pass, irfft(rfft(dry) * port_gain, N))


dry = scene()
out = record(dry)
dump_mix(out)
```